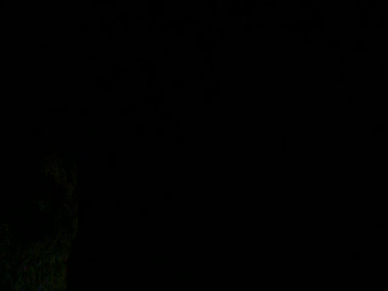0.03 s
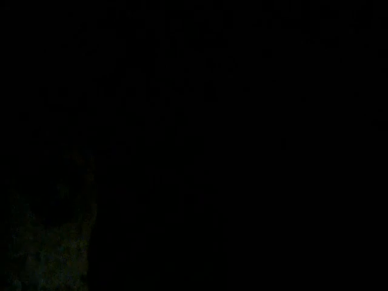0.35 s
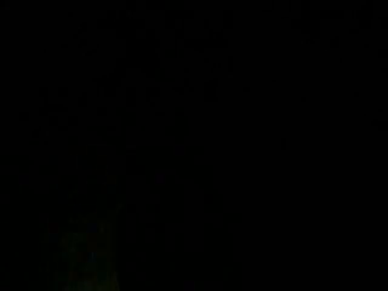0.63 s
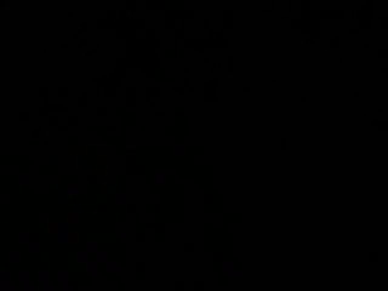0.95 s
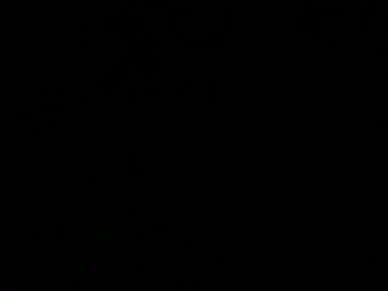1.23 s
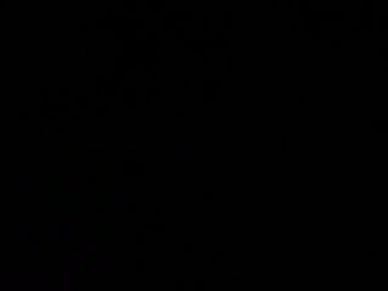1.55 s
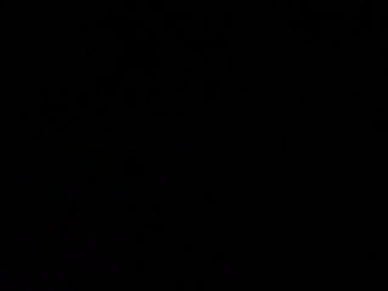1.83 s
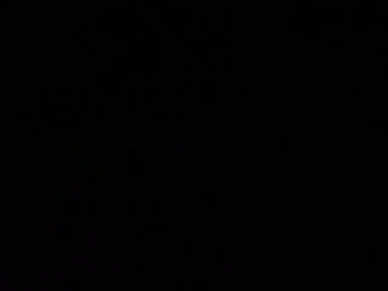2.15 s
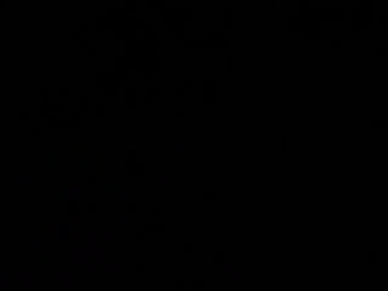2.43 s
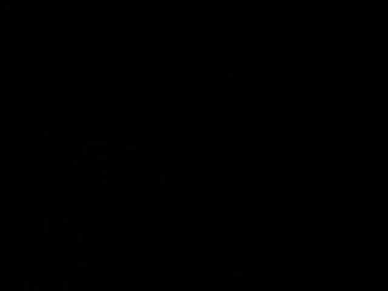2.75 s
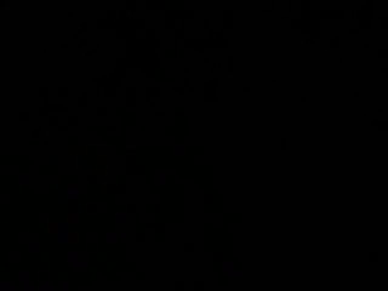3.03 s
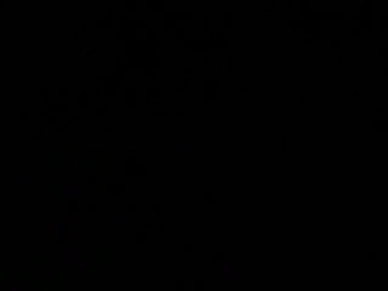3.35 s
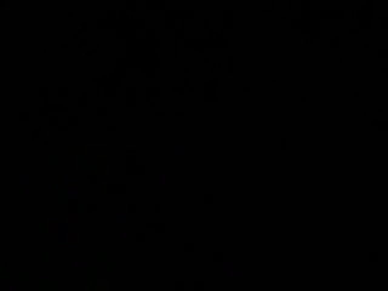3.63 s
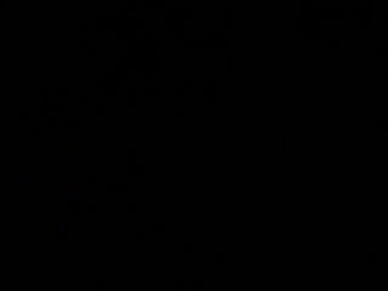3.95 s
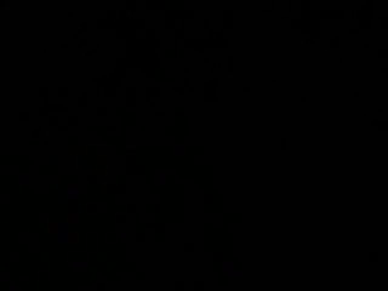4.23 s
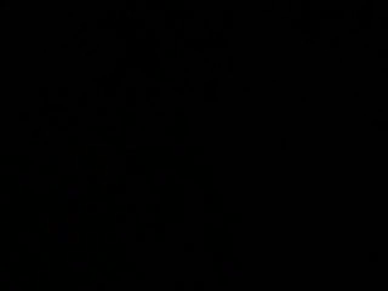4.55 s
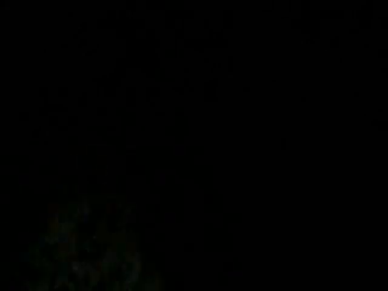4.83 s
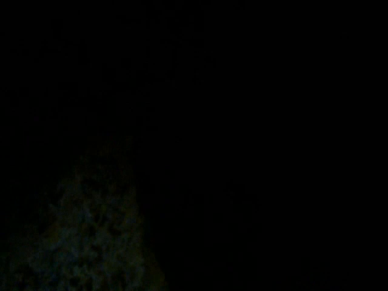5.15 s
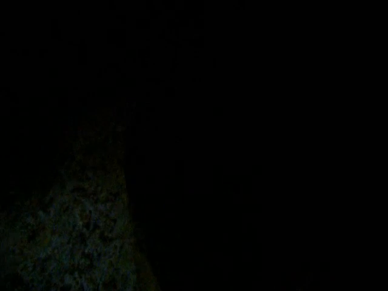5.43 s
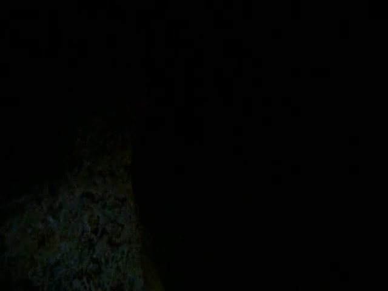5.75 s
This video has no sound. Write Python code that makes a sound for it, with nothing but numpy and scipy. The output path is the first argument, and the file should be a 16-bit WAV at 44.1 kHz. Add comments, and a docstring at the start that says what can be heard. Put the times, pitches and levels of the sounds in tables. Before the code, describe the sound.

Irregular close knocks, crunches and scuffs of boots and gear on a dirt tunnel floor, over a low rumble of air.

```python
"""Someone carries a camera slowly along a dirt-floored rock tunnel. From the start the air rumbles,
clothing rustles, soles scuff and the camera's stabiliser twitches. Boots and gear then knock and crunch
close by, exciting the modes of a hollow housing. Midway a long scuff passes; the knocks return, two of
them squeaking by stick-slip, and near the end stones snap loudly under a boot.
Throughout, the rough walls give back only a faint echo."""
import sys
import numpy as np
from scipy import signal
from scipy.fft import rfft, irfft
from scipy.io import wavfile
from scipy.ndimage import uniform_filter1d

SR = 44100
rng = np.random.default_rng(int(sys.argv[2]) if len(sys.argv) > 2 else 0)


def file_out(sig):
    """Save sig as 16-bit WAV at sys.argv[1]."""
    # one column per channel
    cols = np.atleast_2d(sig).T
    # limit, then scale
    lim = np.clip(cols, -1, 1)
    pcm = np.round(lim * 32767).astype(np.int16)
    wavfile.write(sys.argv[1], SR, pcm)


N = 264600

# spectrum of the tunnel's rumble and hiss: f/Hz, level/dB
AIR_SPECTRUM = [(20, -39.5), (32, -27), (50, -2.5), (75, 2), (110, -5), (150, -8), (220, -11), (350, -20.5),
                (700, -23.5), (1500, -25), (4000, -59), (8000, -49.5), (16000, -75)]
# low air resonances of the tunnel: f/Hz, bandwidth/Hz, level/dB
AIR_MODES = [(115.5, 3.3, -59), (177.1, 6.5, -61.5)]
# soles sliding over dirt: peak t/s, level/dB, rise/s, fade/s
SLIDES = [(0.06, -51.5, 0.058, 0.12), (0.58, -58, 0.15, 0.14), (1.05, -59, .1, .15),
          (1.76, -48, 0.064, 0.37), (3.42, -47.5, 0.33, 0.6), (3.83, -46.5, 0.06, 0.065),
          (4.912, -50.5, 0.051, 0.059), (5.24, -47.5, 0.037, 0.067)]
# friction spectrum of dirt: f/Hz, level/dB
DIRT_SPECTRUM = [(150, 6.5), (300, 10.5), (500, 4), (950, 1.5), (1500, -0.5), (2800, -3), (4200, -9),
                 (6200, -9.5), (8000, -17.5), (10000, -13.5), (12000, -16), (15000, -17)]
# reverberation time of the tunnel: f/Hz, T60/s
WALL_DECAY = [(150, 1), (700, 0.4), (2500, 0.13), (8000, 0.17), (16000, 0.06)]
# stretches of faint twitching while the camera moves: first t/s, last t/s
RESTLESS_SPANS = [(0.01, 0.14), (0.575, 1.04), (3.007, 3.28), (3.5, 3.81), (5.736, 5.83)]
# the stabiliser's clearest twitches: t/s, thump level/dB, rub level/dB
TWITCHES = [(0.211, -43.5, -59), (0.314, -46.5, -44.5), (0.438, -43, -55.5), (0.542, -39, -51),
            (0.941, -41, -55), (1.64, -36.5, -50), (2.038, -40.5, -65), (2.18, -43.5, -51.5),
            (2.211, -42, -50.5), (2.417, -39, -50.5), (2.509, -43.5, -54), (3.073, -43.5, -51),
            (3.148, -44, -48), (3.44, -40, -36.5), (3.84, -42, -53), (5.206, -39.5, -43.5),
            (5.337, -39, -51), (5.902, -41, -46)]
# friction spectrum of the stabiliser: f/Hz, level/dB
RUB_SPECTRUM = [(250, -7), (750, -16.5), (990, 2), (1400, -15.5), (2700, -16.5), (4500, -21.5), (9000, -26),
                (16000, -30.5)]
# stones snapping under a boot: t/s, level/dB, grinding time/s
STONE_SNAPS = [(0.0376, -48, 0.0023), (2.24, -54.5, 0.002), (3.435, -39, 0.0037), (3.827, -53, 0.0025),
               (3.92, -45.5, 0.0037), (5.239, -52, 0.0047), (5.318, -54, 0.0038), (5.5041, -29, 0.00022),
               (5.508, -26, 0.007), (5.663, -42.5, 0.00067), (5.668, -26.5, 0.0064)]
# frequency response of a stone: f/Hz, level/dB
STONE_SPECTRUM = [(200, -23.5), (800, -13.5), (1100, -15.5), (1900, -1), (2150, -5.5), (2480, 4.5),
                  (3100, -7), (4600, -10.5), (5500, -5.5), (6500, -20), (8300, -29.5), (10300, -12.5),
                  (12000, -19), (15500, -19.5)]
# blows of boots and gear: t/s, ring level/dB, thud/dB re ring, clack/dB re ring, time under load/s
BLOWS = [(0.234, -47, -12, -12, 0.013), (1.065, -50.5, -3.5, -2, .002), (1.0967, -37.5, -8.5, -5, 0.0053),
         (1.355, -50, -15, -13, 0.0035), (1.765, -24.5, -3.5, -1.5, 0.025),
         (1.7921, -18.5, -6.5, 1, 0.0087), (1.8515, -29, -6.5, -1, 0.011), (1.898, -42.5, 6.5, -7, 0.014),
         (2.089, -32.5, -3.5, -1, 0.0079), (2.105, -39.5, 3, -9, .01), (2.2958, -29, -8.5, -1, 0.016),
         (2.552, -28.5, -7, -1, 0.0069), (2.65, -41.5, -9, -3, 0.014), (2.668, -37, -18, -4, 0.013),
         (2.768, -38, -2.5, -9, 0.011), (3.178, -28, -3.5, 2.5, 0.0075), (3.2945, -45.5, 7.5, -3, 0.0027),
         (3.3094, -33.5, -12, -6.5, 0.0015), (3.565, -47, 5.5, -5, 0.0029), (3.586, -43, -22, -22, 0.0038),
         (4.3913, -30, -9.5, -5, 0.014), (4.594, -41, 3.5, -3.5, 0.012), (4.715, -23, -9, -6, 0.01),
         (4.751, -28, -8, -0.5, 0.0026), (4.757, -22.5, -9, -0.5, 0.0034), (4.934, -41, -22, -10, 0.015),
         (4.974, -44, -12.5, -3, 0.013), (5.043, -25.5, -6.5, -9, 0.015), (5.143, -27.5, -8, -4.5, 0.017)]
# thud, clack, ring and grit bands of a blow: lower f/Hz, upper f/Hz
BLOW_BANDS = [(400, 1000), (1000, 1650), (1650, 3000), (3000, 17000)]
# modes of the housing, a short cavity's odd multiples of 2 kHz among them: f/Hz, width/Hz, level/dB
HOUSING_MODES = [(272, 55, -15.5), (677, 112, -3), (952, 84, -8), (1059, 49, -4), (1213, 45, 3.5),
                 (1311, 59, 5), (1436, 59, 6.5), (1622, 53, 4), (1790, 51, 5.5), (1934, 140, 2.5),
                 (2060, 154, 0), (2480, 120, -2.5), (2680, 270, -13), (3550, 390, -21.5), (4480, 420, -21),
                 (5560, 180, -13.5), (6070, 365, -13.5), (6650, 300, -17), (9780, 680, -20),
                 (10340, 440, -20), (12600, 1600, -29.5), (14150, 540, -18), (15100, 600, -40)]
# knocks that catch and squeak: middle t/s, level/dB, half length/s
CATCHES = [(2.305, -26, 0.0084), (5.055, -19, 0.012), (5.148, -26.5, 0.006)]
# partials of the cavity, near odd multiples of the lowest: f/Hz, level/dB
CAVITY_PARTIALS = [(1965, -1.5), (6040, -12), (9950, -15), (14030, -20)]


def gain_of(db):
    """Amplitude ratio of a level in decibels."""
    return 10 ** (np.asarray(db) / 20)


def unit_rms(x):
    """Normalisation to rms 1."""
    return x / np.sqrt(np.mean(x ** 2) + 1e-20)


def unit_hit(x):
    """Normalisation to the energy of 20 ms at rms 1."""
    return x / np.sqrt(np.sum(x ** 2) / (.02 * SR) + 1e-20)


def curve_at(points, hz):
    """Linear interpolation on a log-frequency axis."""
    f, value = np.transpose(points)
    return np.interp(np.log(hz + 1), np.log(f), value)


def add(mix, s, sound):
    """Superposition of a sound on the mix from time s."""
    part = mix[max(round(s * SR), 0):][:len(sound)]
    part += sound[:len(part)]


def tinted(x, spectrum):
    """Spectral shaping of a steady sound, at rms 1."""
    hz = np.fft.rfftfreq(len(x), 1 / SR)
    return unit_rms(irfft(rfft(x) * gain_of(curve_at(spectrum, hz)), len(x)))


def lumps(count, size):
    """Low-pass noise of rms 1, its lumps about size samples wide."""
    return unit_rms(uniform_filter1d(uniform_filter1d(rng.standard_normal(count), size), size))


def grains(count, spread_db):
    """Granular noise: a dense run of tiny contacts of very unequal size."""
    noise = rng.standard_normal(count)
    return unit_rms(noise * gain_of(spread_db * np.minimum(rng.exponential(1, count), 4)))


def minimum_phase(db):
    """Minimum-phase impulse response for a gain given round the whole frequency circle."""
    log_spectrum = np.conj(signal.hilbert(np.log(gain_of(db))))
    return np.fft.ifft(np.exp(log_spectrum)).real


def tunnel_air():
    """Resonance: over steady rumble and hiss, two low air modes driven by noise waver in level."""
    hz = np.fft.rfftfreq(N, 1 / SR)
    out = gain_of(-54) * tinted(rng.standard_normal(N), AIR_SPECTRUM)
    for centre, width, db in AIR_MODES:
        detuning = 2 * (hz - centre) / width
        drone = irfft(rfft(rng.standard_normal(N)) / (1 + detuning ** 2), N)
        out += gain_of(db) * unit_rms(drone)
    return out


def scuffs(rustle_db=-61, surge_db=1.53, tick_db=-9, ticks_per_s=55):
    """Sliding friction: each slide adds its power to the clothing's rustle, and single grains tick."""
    t, power = np.arange(N) / SR, gain_of(rustle_db) ** 2
    for s, db, rise, fade in SLIDES:
        swell = np.exp(-np.maximum((s - t) / rise, (t - s) / fade))
        power = power + (gain_of(db) * swell) ** 2
    envelope = np.sqrt(power) * gain_of(surge_db * lumps(N, size=550))
    ticks = unit_rms(rng.standard_normal(N) * (rng.random(N) < ticks_per_s / SR))
    return envelope * tinted(grains(N, spread_db=3) + gain_of(tick_db) * ticks, DIRT_SPECTRUM)


def wall_echo(x, build_s=0.0093):
    """Diffuse reverberation: echoes scattered by rough rock decay exponentially, the treble first."""
    hz, t, noise = signal.stft(rng.standard_normal(SR), SR, nperseg=256)
    decay = gain_of(-60 * t / curve_at(WALL_DECAY, hz)[:, None])
    onset = 1 - np.exp(-t / build_s)
    tail = signal.istft(noise * decay * onset, SR, nperseg=256)[1]
    return signal.fftconvolve(x, tail / np.linalg.norm(tail))[:N]


def faint_twitches(pace_s=0.08, jitter_s=0.0067, thump_db=-48, rub_db=-55.5, spread_db=2.3):
    """A quasi-periodic pulse train through each restless span, as rows like those of TWITCHES."""
    rows = []
    for first, last in RESTLESS_SPANS:
        for s in np.linspace(first, last, round((last - first) / pace_s) + 1):
            late, thump, rub = rng.standard_normal(3)
            rows.append((s + jitter_s * late, thump_db + spread_db * thump, rub_db + spread_db * rub))
    return rows


def stabiliser(thump_hz=296, swell_s=0.0079, rub_s=0.0099, drive_hz=8020, whine_db=-24, size=4096):
    """Amplitude modulation: each brief shudder rubs and puts two sidebands round the motor's carrier."""
    t, out = (np.arange(size) - size / 2) / SR, np.zeros(N + size)
    for s, thump_db, rub_db in TWITCHES + faint_twitches():
        pitch, phase = thump_hz * (1 + 0.056 * rng.standard_normal()), rng.random()
        thump = unit_hit(np.sin(2 * np.pi * (pitch * t + phase)) / np.cosh(np.pi / 2 * t / swell_s))
        whine = gain_of(whine_db) * thump * np.cos(2 * np.pi * drive_hz * t)
        friction = tinted(grains(size, spread_db=5), RUB_SPECTRUM)
        rub = unit_hit(friction * np.exp(-(t / rub_s) ** 2))
        add(out, s, gain_of(thump_db) * (thump + whine) + gain_of(rub_db) * rub)
    return out[size // 2:][:N]  # centres each twitch on its time


def crush(hold_s, release_s, spread_db, settle_db, settle_s, rise_s=0.00024, size=8192):
    """Granular yielding: grit slips while the load holds; then the slips die and loose grains settle."""
    t = np.arange(size) / SR
    unloaded = np.maximum(t - hold_s, 0)
    onset = 1 - np.exp(-t / rise_s)
    decay = np.exp(-unloaded / release_s) + gain_of(settle_db) * np.exp(-unloaded / settle_s)
    slips = gain_of(3 * np.tanh(lumps(size, size=80)))
    return onset * decay * slips * grains(size, spread_db)


def body_response(db_at, ripple_db=2.6, size=4096):
    """Impulse response of a body with gain db_at(hz); crowded small modes ripple its treble."""
    hz = abs(np.fft.fftfreq(size, 1 / SR))
    bins = np.rint(hz * size / SR).astype(int)
    ripple = lumps(size, size=9)[bins] * (hz > 2200)
    return minimum_phase(db_at(hz) + ripple_db * ripple)


def stone_snaps():
    """Impulsive excitation: each stone cracks and rings its own way; a longer grind settles longer."""
    out = np.zeros(N)
    for s, db, grind_s in STONE_SNAPS:
        force = crush(0, grind_s, spread_db=1.5, settle_db=-5.5, settle_s=2.98 * grind_s)
        stone = body_response(lambda hz: curve_at(STONE_SPECTRUM, hz))
        add(out, s, gain_of(db) * unit_hit(signal.fftconvolve(force, stone)))
    return out


def housing_db(hz):
    """Modal summation: the powers of the housing's resonances add up to its gain."""
    centre, width, db = np.transpose(HOUSING_MODES)
    detuning = 2 * (hz[:, None] - centre) / width
    mode_power = gain_of(db) ** 2 / (1 + detuning ** 2) ** 1.274
    return 10 * np.log10(mode_power.sum(1))


def balanced(hit, levels_db, size=2048):
    """Equalisation of a hit to these levels in its thud, clack, ring and grit bands."""
    hz, power = np.fft.rfftfreq(len(hit), 1 / SR), abs(rfft(hit)) ** 2
    band_power = np.array([power[(hz >= lo) & (hz < hi)].sum() for lo, hi in BLOW_BANDS])
    shift_db = levels_db - 10 * np.log10(band_power / power.sum())
    corners_hz = np.ravel(np.multiply(BLOW_BANDS, [1.1, .9]))  # leaves slopes between the bands
    filter_db = np.interp(abs(np.fft.fftfreq(size, 1 / SR)), corners_hz, np.repeat(shift_db, 2))
    return signal.fftconvolve(unit_hit(hit), minimum_phase(filter_db))


def knocks(push_s=0.00011, push_db=-8.5, grit_db=-5, light_db=-37, light_range_db=6.5):
    """Forced vibration: a push and a crunch ring the housing; where they land sets thud and clack."""
    housing, out = body_response(housing_db), np.zeros(N)
    for s, ring_db, thud_db, clack_db, hold_s in BLOWS:
        # light touches crunch without the opening click
        lightness = np.clip((light_db - ring_db) / light_range_db, 0, 1)
        rise_s = lightness * 0.00083 + (1 - lightness) * 0.0005
        release_s = 0.0071 + 0.45 * hold_s  # slips die sooner after a brief tap
        crunch = crush(hold_s, release_s, spread_db=3, settle_db=-11, settle_s=0.029, rise_s=rise_s)
        push = np.exp(-np.arange(len(crunch)) / SR / push_s)
        ring = unit_hit(signal.fftconvolve(crunch, housing))
        click = (1 - lightness) * gain_of(push_db) * unit_hit(signal.fftconvolve(push, housing))
        levels_db = ring_db + np.array([thud_db, clack_db, 0, grit_db])
        add(out, s, balanced(ring + click, levels_db))
    return out


def squeaks(waver=0.024, size=4096):
    """Stick-slip friction briefly sustains the cavity's odd partials at a wavering pitch."""
    t, out = (np.arange(size) - size / 2) / SR, np.zeros(N)
    for s, db, half_s in CATCHES:
        drift = unit_rms(uniform_filter1d(rng.standard_normal(size), size=60))
        clock = np.cumsum(1 + waver * drift) / SR
        tone = sum(gain_of(partial_db) * np.sin(2 * np.pi * (hz * clock + rng.random()))
                   for hz, partial_db in CAVITY_PARTIALS)
        envelope = np.exp(-(t / half_s) ** 4)
        add(out, s + t[0], gain_of(db) * unit_hit(tone * envelope))
    return out


def scene():
    """Superposition of the direct sound, its faint echo and the tunnel's rumble."""
    rumble = tunnel_air()
    direct = knocks() + squeaks() + stone_snaps() + scuffs() + stabiliser()
    echo = gain_of(-25) * wall_echo(direct)
    return (direct + echo + rumble)[None]


def record(dry, bass_hz=38, edge_hz=16000):
    """Band limiting: the microphone rolls off the bass and the recorder cuts the highest treble."""
    highpass = signal.butter(3, bass_hz, "highpass", fs=SR, output="sos")
    lowpass = signal.firwin(511, edge_hz, window=("kaiser", 9), fs=SR)
    return signal.oaconvolve(signal.sosfilt(highpass, dry), lowpass[None], "same")


dry = scene()
out = record(dry)
file_out(out)
```